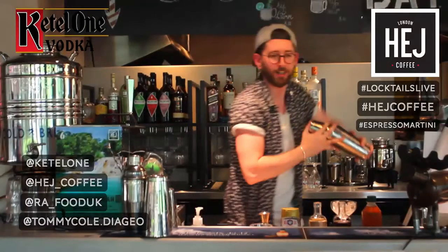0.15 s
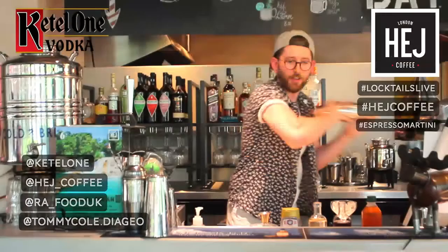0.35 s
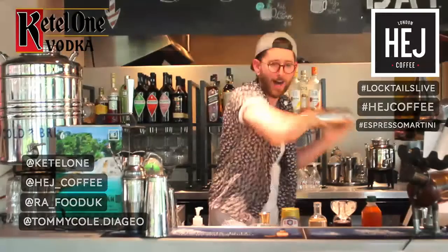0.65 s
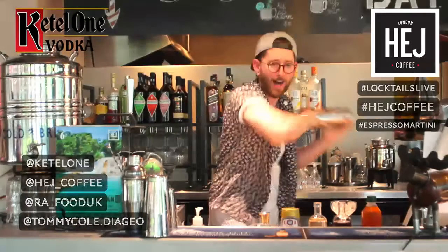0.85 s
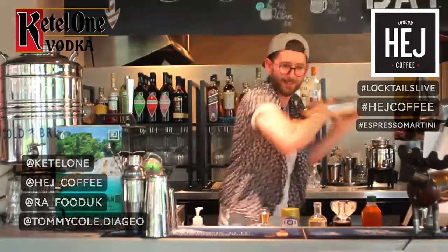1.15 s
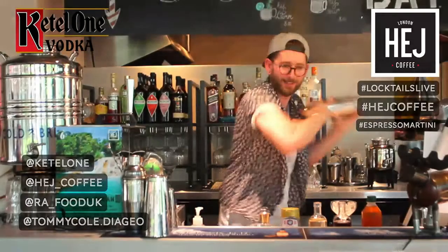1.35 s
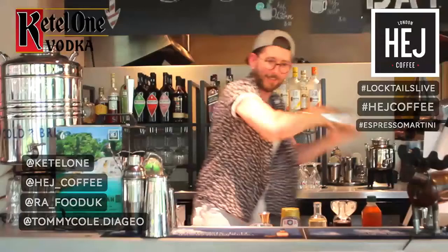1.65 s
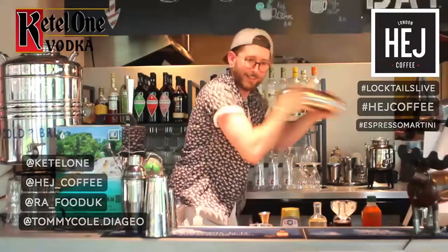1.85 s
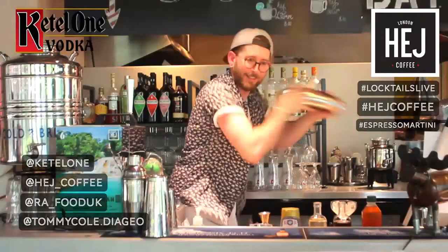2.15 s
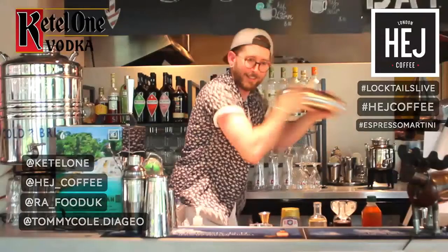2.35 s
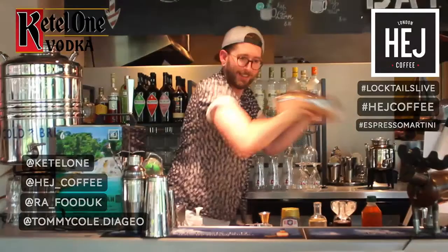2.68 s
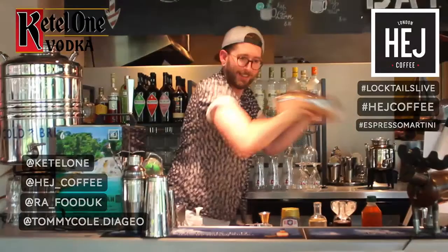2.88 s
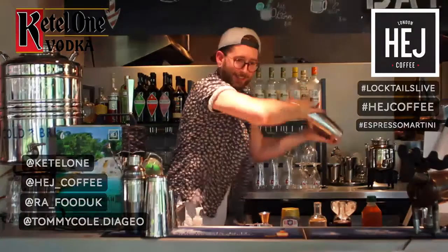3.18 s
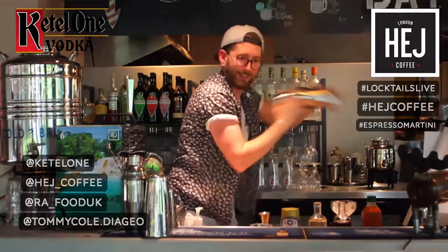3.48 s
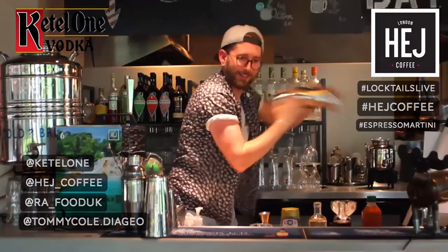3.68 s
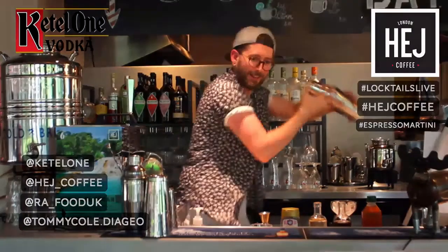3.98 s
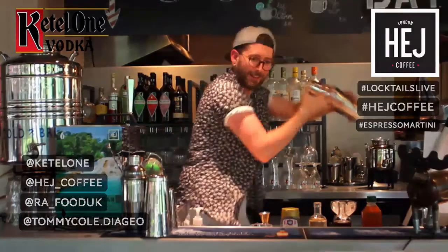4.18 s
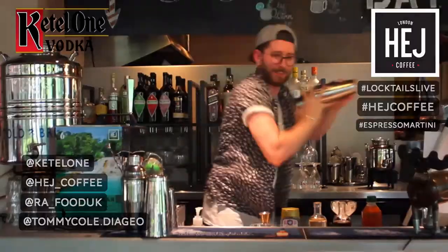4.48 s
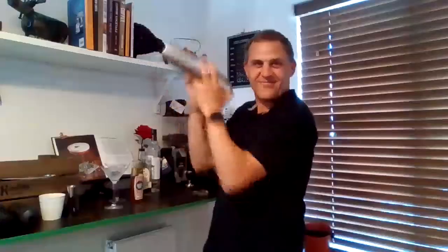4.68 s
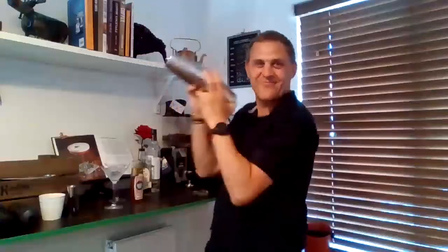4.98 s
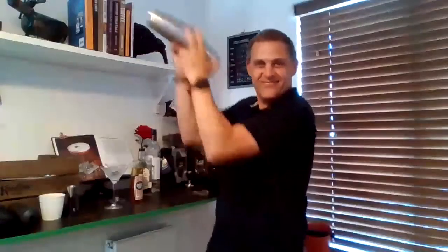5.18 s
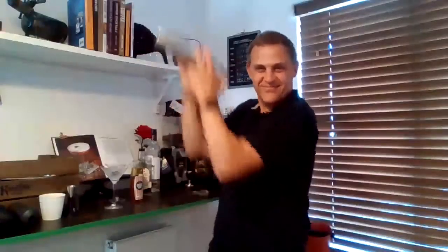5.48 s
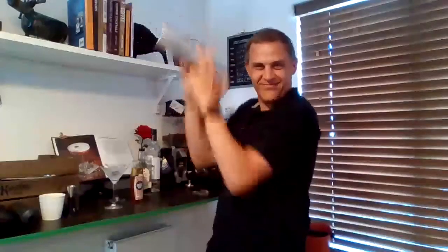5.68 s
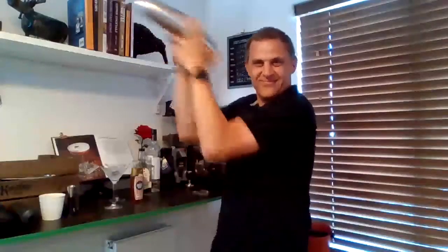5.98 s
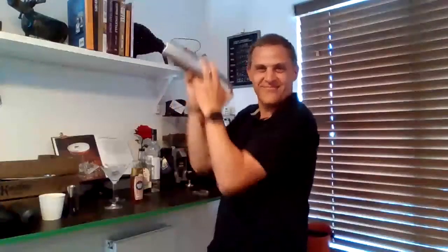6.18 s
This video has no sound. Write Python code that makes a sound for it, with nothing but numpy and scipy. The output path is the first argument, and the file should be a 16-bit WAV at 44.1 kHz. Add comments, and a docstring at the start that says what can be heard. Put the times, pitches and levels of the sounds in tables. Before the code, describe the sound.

A steel cocktail shaker is shaken vigorously, ice cubes crashing against the metal in a quick, continuous rhythm.

```python
"""Ice rattles hard in a steel cocktail shaker, about nine strokes a second, in a small hard-walled room.
The cubes crash against the tin in short loud surges; in between they tumble along its wall.
Hands and liquid damp the steel, so it rings only briefly. Now and then a ping or a hollow knock stands
out, or the rattle thins to a few glassy tones. A narrow-band microphone hears it over faint room tone."""
import sys
import numpy as np
from scipy import signal
from scipy.fft import rfft, irfft, next_fast_len
from scipy.io import wavfile
from scipy.ndimage import uniform_filter1d

SR = 44100
rng = np.random.default_rng(int(sys.argv[2]) if len(sys.argv) > 2 else 0)


def output_pcm(signal):
    """Save a mono or channel-first signal as 16-bit PCM at the path in sys.argv[1].

    Samples are clipped to [-1, 1] before scaling.
    """
    pcm = np.clip(np.atleast_2d(signal).T, -1, 1) * 32767
    wavfile.write(sys.argv[1], SR, np.round(pcm).astype(np.int16))


N = 279594
TIME = np.arange(N) / SR
CUTOFF_HZ = 7200   # top of the microphone's band

# broad colour of ice on the filled tin: frequency_hz, level_db
CLACK_SPECTRUM = [(60, -38), (150, -30.5), (280, -24.5), (390, -17), (620, -16.5), (850, -9.5), (1200, -6),
                  (1800, -2.5), (2300, -0.5), (3100, 2), (4000, -2.5), (5200, -5), (5800, -8), (7100, -7.5)]
# damped resonances of the tin and its air: centre_hz, width_hz, lift_db
TIN_RESONANCES = [(377, 74, 3), (465, 27, 6.5), (601, 22, 5.5), (945, 250, 3.5), (1387.5, 69, 3),
                  (1510, 100, 3), (1768, 130, 0.5), (2650, 142, 1.5), (2838, 150, -0.5), (3292, 210, -2),
                  (4410, 34, -0.5), (4620, 140, -0.5), (6330, 160, 2.5), (6980, 230, 2.5)]


def from_db(db):
    """Decibels to gain."""
    return 10 ** (np.asarray(db) / 20)


def unit_energy(x):
    """Scale a response so that it passes the energy of a click unchanged."""
    return x / np.sqrt(np.sum(x ** 2) + 1e-20)


def crossover(x, hz, kind):
    """A two-pole filter applied twice, so that neighbouring bands add up flat."""
    return signal.sosfilt(np.tile(signal.butter(2, hz, kind, fs=SR, output="sos"), (2, 1)), x + 1e-18)


def colour(x, spectrum, resonances=()):
    """An equaliser: a broad curve with resonances on top, at about the same power for white input."""
    size = 8192
    hz = np.maximum(np.arange(size // 2 + 1) * SR / size, 1)
    curve_hz, curve_db = np.transpose(spectrum)
    db = np.interp(np.log(hz), np.log(curve_hz), curve_db)
    for centre, width, lift_db in resonances:
        db = db + lift_db / (1 + (2 * (hz - centre) / width) ** 2)
    gain = from_db(db) / np.sqrt(np.mean(from_db(db) ** 2 * (hz < CUTOFF_HZ)))
    cepstrum = irfft(np.log(gain))[:size // 2]
    cepstrum[1:] *= 2   # minimum phase: nothing sounds before the contact
    response = irfft(np.exp(rfft(cepstrum, size)))
    return signal.fftconvolve(x, response)[:N]


def dying_noise(t60_s):
    """Many close modes or echoes that die together, half a second long."""
    t = TIME[:SR // 2]
    return unit_energy(rng.standard_normal(len(t)) * from_db(-60 * t / t60_s))


def room_tone(level_db):
    """A steady bed of soft hiss with a low rumble."""
    # colour of the room's air: frequency_hz, level_db
    air_spectrum = [(20, -18), (45, -10), (75, 6), (100, -4), (200, -10.5), (500, -5.5), (2000, -6),
                    (7000, -19.5)]
    return from_db(level_db) * colour(rng.standard_normal(N), air_spectrum)


def glassy_lulls(rattle, hold_s, detune_spread, tones_db, uneven_db, focus_db_per_octave):
    """The level dips briefly while glassy tones, about as loud as the rattle was, swell and fade."""
    # instants where the rattle thins: middle_s, length_s, dip_db, focus_hz
    lulls = [(0.126, 0.01, -11, 2680), (0.186, 0.017, -8, 4260), (0.432, 0.02, -9, 2720),
             (0.48, 0.021, -14, 2900), (1.214, 0.018, -13, 3050), (1.332, 0.018, -15, 3400),
             (1.565, 0.022, -32, 2230), (1.893, 0.02, -7, 1700), (2.535, 0.031, -33, 2700),
             (2.708, 0.017, -5, 2100), (3.471, 0.02, -30, 2940), (4.289, 0.023, -17, 2900),
             (5.226, 0.024, -24, 2600), (5.372, 0.02, -4, 3200), (5.798, 0.022, -12, 3600),
             (5.962, .014, -19, 1700)]
    # glassy tones, close to the tin's own pitches: pitch_hz, level_db
    glassy_tones = [(945, -3.5), (1150, -8.5), (1410, -4), (1560, -2), (1765, -4.5), (2090, -6.5),
                    (2400, -5.5), (2700, -0.5), (2880, 1.5), (3030, -5), (3190, -2.5), (3420, -8),
                    (3680, -5), (3900, -7), (4450, -5.5), (4820, -7), (5500, -16.5), (6250, -9.5),
                    (6720, -4), (7150, -15.5)]
    pitches, levels = np.transpose(glassy_tones)
    out = rattle.copy()
    for middle, length, dip_db, focus_hz in lulls:
        near = abs(TIME - middle) < .08
        t = TIME[near] - middle
        swell = np.exp(-(2 * t / (length + hold_s)) ** 4)
        loudness = np.sqrt(np.average(rattle[near] ** 2, weights=swell))
        detune, luck, phase = rng.standard_normal((3, len(pitches)))
        hz = pitches * np.exp(detune_spread * detune)
        off_focus_db = focus_db_per_octave * abs(np.log2(hz / focus_hz))
        gains = unit_energy(from_db(levels + uneven_db * luck - off_focus_db))
        tones = np.sqrt(2) * gains @ np.sin(2 * np.pi * (hz[:, None] * t + phase[:, None]))
        out[near] *= from_db(dip_db * np.exp(-(2 * t / length) ** 4))
        out[near] += from_db(tones_db) * loudness * swell * tones
    return out


def wall_ring(force, hits_per_s, t60_s, tilt, modes_per_cluster=5):
    """Rare square hits set clusters of wall modes singing, each mode at moments of its own."""
    # the wall's ring relative to the blows: time_s, level_db
    ring_levels = [(0, -7.5), (5.05, -10.5), (5.18, -2.5), (5.42, -7), (5.55, -9.5), (6.34, -10)]
    drive = force * from_db(np.interp(TIME, *np.transpose(ring_levels)))
    radius = from_db(-60 / (t60_s * SR))
    out, energy = 0, 0
    for centre, width, lift_db in TIN_RESONANCES:
        if centre < 1000:
            continue   # hands and liquid choke the low modes
        gain = from_db(tilt * np.interp(centre, *np.transpose(CLACK_SPECTRUM)) + lift_db)
        offsets = (np.arange(modes_per_cluster) + rng.random(modes_per_cluster)) / modes_per_cluster - .5
        for hz in centre + width * offsets:
            strikes = np.zeros(N)
            at = rng.integers(0, N, int(hits_per_s * N / SR))
            strikes[at] = drive[at] * rng.standard_normal(len(at)) * np.sqrt(SR / hits_per_s)
            poles = [1, -2 * radius * np.cos(2 * np.pi * hz / SR), radius ** 2]
            out = out + gain * signal.lfilter([1, 0, -1], poles, strikes + 1e-18)
            energy += gain ** 2 * 2 / (1 - radius ** 2)
    return out / np.sqrt(energy)


def short_tone(start_s, hz, t60_s, swell_s):
    """A pure tone swells quickly and dies away."""
    out, first = np.zeros(N), int(start_s * SR)
    t = TIME[:min(SR // 2, N - first)]
    envelope = (1 - np.exp(-t / swell_s)) * from_db(-60 * t / t60_s)
    out[first:first + len(t)] = envelope * np.sin(2 * np.pi * (hz * t + rng.random()))
    return out


def pings_and_knocks():
    """Now and then a thin, high ping or a hollow knock stands out."""
    # short high pings: start_s, pitch_hz, level_db
    pings = [(0.161, 4350, -22.5), (0.639, 6860, -30), (2.153, 4320, -32), (3.49, 7180, -27.5),
             (5.124, 6000, -28.5), (5.751, 6900, -23.5)]
    # hollow knocks, each a ring over a low boom: start_s, ring_db, boom_db
    knocks = [(.765, -31.5, -42), (1.199, -28.5, -47), (1.565, -35, -46.5), (1.878, -30, -45.5),
              (2.277, -37.5, -41), (2.334, -52, -48)]
    # close pair of modes in a knock's ring: pitch_hz, lift_db, t60_s
    hollow_modes = [(933, 3, 0.2), (946, 3, 0.37)]
    out = sum(from_db(db) * short_tone(start, hz, t60_s=0.35, swell_s=0.0044) for start, hz, db in pings)
    for start, ring_db, boom_db in knocks:
        out += from_db(boom_db) * short_tone(start, hz=243, t60_s=0.18, swell_s=0.0071)
        for hz, lift_db, t60_s in hollow_modes:
            out += from_db(ring_db + lift_db) * short_tone(start, hz, t60_s, swell_s=0.0043)
    return out


def cube_contact(clink_hz, clink_t60_s, clink_db, wall_t60_s, wall_db, room_t60_s, room_db):
    """One cube on one spot: a sharp crack, the wall's short ring, the cube's clink, then the room."""
    t = TIME[:SR // 10]
    crack = from_db(wall_db) * dying_noise(wall_t60_s)[:len(t)]
    crack[0] += 1
    clink = np.sin(2 * np.pi * clink_hz * t) * from_db(-60 * t / clink_t60_s)
    contact = unit_energy(crack) + from_db(clink_db) * unit_energy(clink)
    room = from_db(room_db) * dying_noise(room_t60_s) * (TIME[:SR // 2] > .004)   # 4 ms pre-delay
    room[0] = 1   # direct sound
    return unit_energy(signal.fftconvolve(contact, room)[:SR // 2])


def collisions(per_s, spread_db, share_s):
    """Random clicks, a few big among many small; those close in time share the momentum of the ice."""
    sizes = from_db(spread_db * np.minimum(rng.exponential(1, N), 4)) * rng.choice([-1, 1], N)
    clicks = sizes * (rng.random(N) < per_s / SR)
    width = max(int(share_s * SR), 2)
    power = uniform_filter1d(uniform_filter1d(clicks ** 2, width), width)
    return clicks / np.sqrt(np.maximum(power, per_s / SR))


def surge_envelopes(rise_s, settle_s, scatter_db, gain_db):
    """Each surge of the rattle rises fast, holds, then settles: envelopes of thud, clack and splinter."""
    # short loud surges of the rattle: start_s, length_s, level_db; the row at 5.15 s is no stroke of the ice,
    # only a brief swell in the level
    surges = [(0.034, 0.04, -24.5), (0.124, 0.055, -37.5), (0.276, 0.065, -28.5), (0.373, .1, -27.5),
              (0.536, 0.01, -25.5), (0.613, .058, -26), (0.726, 0.082, -22.5), (0.844, 0.055, -22.5),
              (1.009, 0.077, -25.5), (1.092, 0.056, -23.5), (1.184, 0.052, -22.5), (1.345, 0.016, -22),
              (1.41, 0.059, -23), (1.54, 0.044, -21), (1.671, 0.012, -28), (1.793, 0.0037, -27.5),
              (1.861, 0.076, -29.5), (2.003, 0.036, -28.5), (2.234, 0.15, -30), (2.418, 0.055, -28.5),
              (2.514, 0.11, -29), (2.674, 0.05, -29.5), (2.8, 0.036, -27), (2.878, 0.081, -27),
              (2.982, 0.095, -30.5), (3.14, 0.043, -27.5), (3.234, 0.07, -27.5), (3.397, 0.015, -28.5),
              (3.492, 0.022, -25), (3.585, 0.039, -22), (3.678, 0.091, -29.5), (3.831, 0.035, -25.5),
              (3.918, .13, -25.5), (4.068, .06, -26), (4.196, .05, -27), (4.297, 0.067, -25),
              (4.406, 0.05, -27.5), (4.542, 0.047, -26), (4.641, 0.082, -25.5), (4.798, 0.032, -23.5),
              (4.909, .052, -27.5), (5.018, 0.029, -27.5), (5.102, .009, -24.5), (5.148, 0.11, -29.5),
              (5.279, .014, -25), (5.383, 0.032, -26.5), (5.497, 0.051, -25), (5.631, 0.047, -25),
              (5.736, 0.024, -25), (5.845, 0.047, -22), (5.957, 0.049, -26.5), (6.095, .049, -25.5),
              (6.18, 0.08, -24.5), (6.318, .061, -26)]
    # low thud of a middling surge relative to its clack: time_s, level_db
    thud_levels = [(0, 4.5), (1.6, -2), (2.2, 4.5), (3.6, 4), (3.75, 0), (6.34, 1.5)]
    middling_db = -26
    power = np.zeros((3, N))
    for start, length, db in surges:
        thud_luck, splinter_luck = scatter_db * rng.standard_normal(2)
        hardness_db = db - middling_db   # loud surges gain more splinter than thud
        thud_db = np.interp(start, *np.transpose(thud_levels)) + 0.18 * hardness_db + thud_luck
        splinter_db = -0.45 + 0.35 * hardness_db + splinter_luck
        near = slice(max(int((start - rise_s) * SR), 0), int((start + length + .2) * SR))
        t = TIME[near] - start
        envelope = np.clip(t / rise_s + .5, 0, 1) * np.exp(-np.maximum(t - length, 0) / settle_s)
        power[:, near] += (from_db([[db + thud_db], [db], [db + splinter_db]]) * envelope) ** 2
    return from_db(gain_db) * np.sqrt(power)


def ice_rattle(thud_below_hz, splinter_above_hz, tumble_db, cubes_db, cube_count=56):
    """Cubes of many sizes crash and tumble, each with its own clink and echoes, and the wall rings."""
    # cubes tumbling between the turns, following the vigour of the arms: time_s, level_db
    tumble_levels = [(0.0, -19.5), (0.46, -29), (0.92, -23), (1.43, -24), (1.66, -28), (2.24, -27),
                     (2.51, -25.5), (3.48, -25), (4.17, -22.5), (5.67, -25.5), (5.88, -21.5), (6.34, -23)]
    tumble = from_db(np.interp(TIME, *np.transpose(tumble_levels)) + tumble_db)
    tumble_bands = tumble * from_db([[-2.5], [0], [-0.9]])   # thud, clack, splinter
    surge_bands = surge_envelopes(rise_s=0.015, settle_s=0.019, scatter_db=2, gain_db=5)
    surge = surge_bands[1]
    loose = tumble ** 2 / (tumble ** 2 + surge ** 2)   # the tumbling gives way during a surge
    hits = surge_bands * collisions(per_s=1300, spread_db=0.5, share_s=0.0077)
    hits += loose * tumble_bands * collisions(per_s=1100, spread_db=5.0, share_s=0.16)
    struck_cube = rng.integers(0, cube_count, N)
    size = next_fast_len(N + SR // 2, real=True)
    spectra = 0
    for cube, hz in enumerate(np.linspace(800, 7100, cube_count)):   # big cubes clink low, chips high
        contact = cube_contact(hz, clink_t60_s=0.014, clink_db=-7.0, wall_t60_s=0.02, wall_db=3.5,
                               room_t60_s=0.25, room_db=-1)
        own_hits = (hits * (struck_cube == cube)).astype(np.float32)
        spectra = spectra + rfft(own_hits, size) * rfft(contact, size)
    thud, clack, splinter = from_db(cubes_db) * irfft(spectra, size)[:, :N]
    thud = crossover(thud, thud_below_hz, "low")
    clack = crossover(crossover(clack, thud_below_hz, "high"), splinter_above_hz, "low")
    splinter = crossover(splinter, splinter_above_hz, "high")
    rattle = colour(thud + clack + splinter, CLACK_SPECTRUM, TIN_RESONANCES)
    return rattle + wall_ring(surge + loose * tumble, hits_per_s=10, t60_s=0.12, tilt=1.17)


def scene():
    """The shaker over a faint room tone, in mono."""
    rattle = ice_rattle(thud_below_hz=790, splinter_above_hz=3470, tumble_db=-2, cubes_db=-2.5)
    mix = rattle + pings_and_knocks() + room_tone(level_db=-65)
    return glassy_lulls(mix, hold_s=0.011, detune_spread=0.012, tones_db=-1.5, uneven_db=5.0,
                        focus_db_per_octave=7)[None]


def record(dry):
    """The microphone drops the deep bass and everything above its narrow band."""
    bass_cut = signal.butter(2, 45, "high", fs=SR, output="sos")
    top_slope = signal.butter(22, CUTOFF_HZ, fs=SR, output="sos")
    top_cut = signal.ellip(10, .1, 70, 8000, fs=SR, output="sos")
    return signal.sosfilt(np.vstack([bass_cut, top_slope, top_cut]), dry)


dry = scene()
out = record(dry)
output_pcm(out)
```